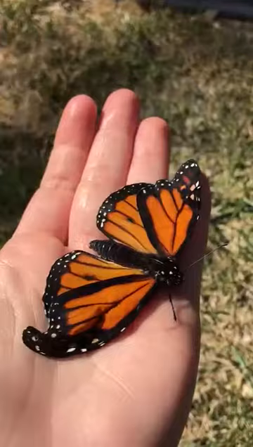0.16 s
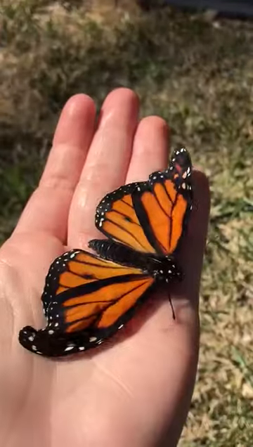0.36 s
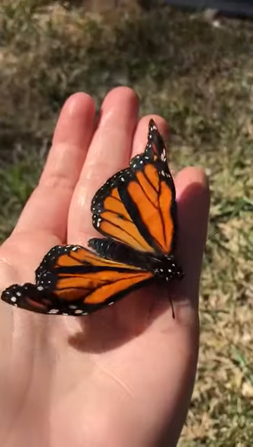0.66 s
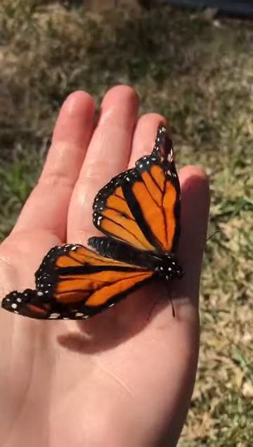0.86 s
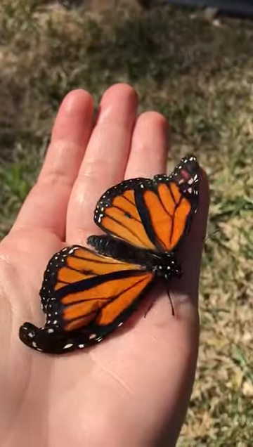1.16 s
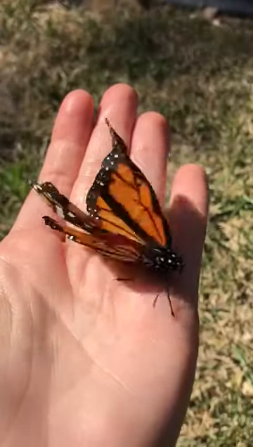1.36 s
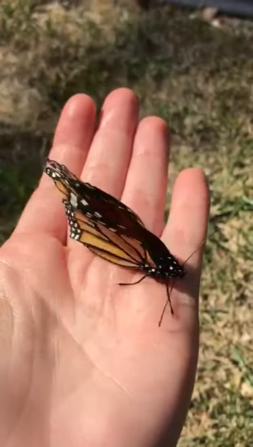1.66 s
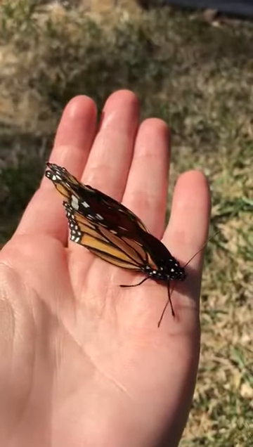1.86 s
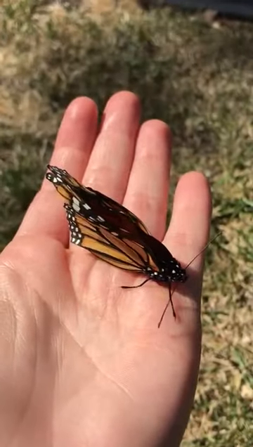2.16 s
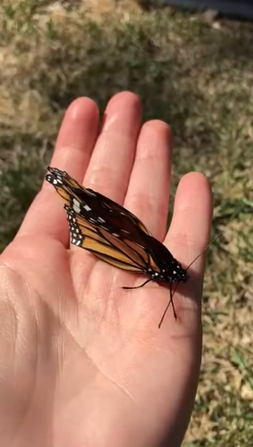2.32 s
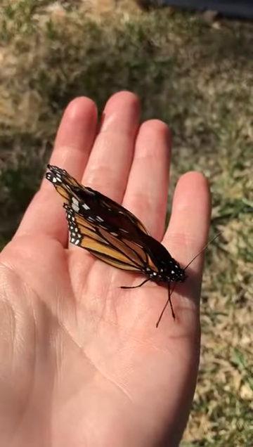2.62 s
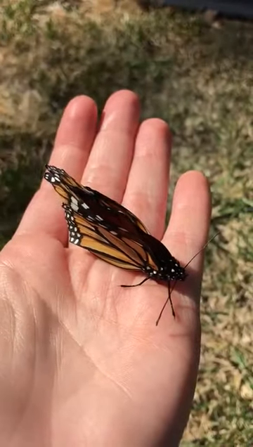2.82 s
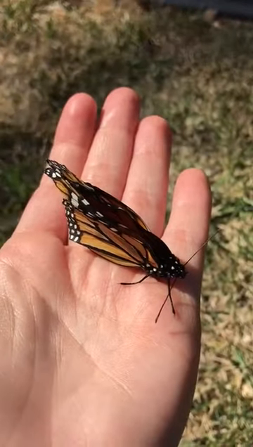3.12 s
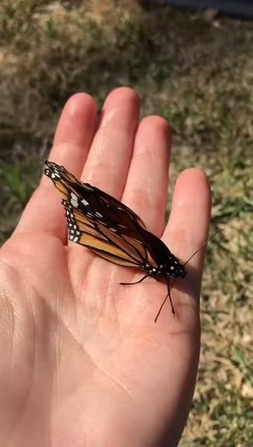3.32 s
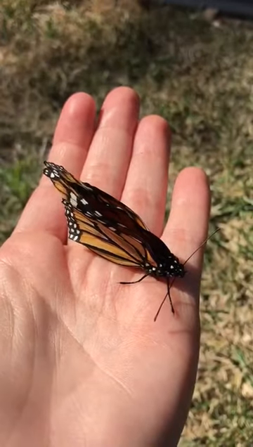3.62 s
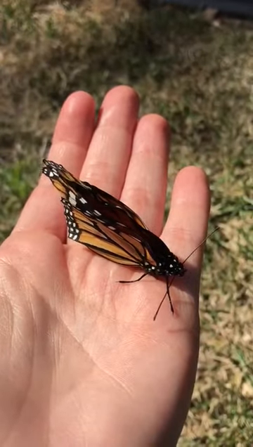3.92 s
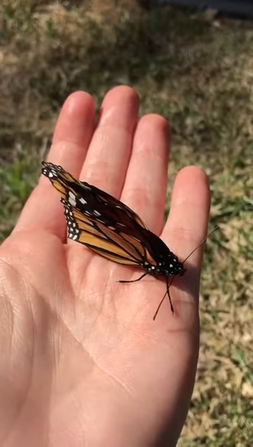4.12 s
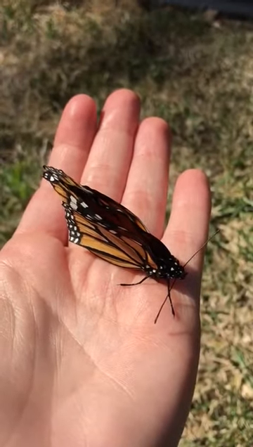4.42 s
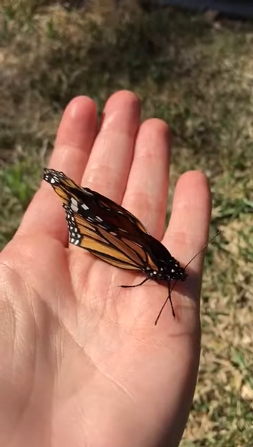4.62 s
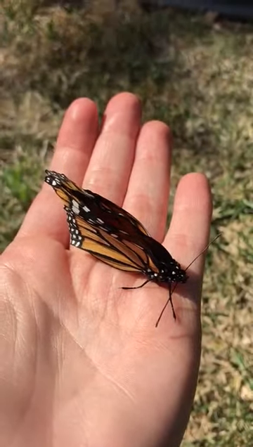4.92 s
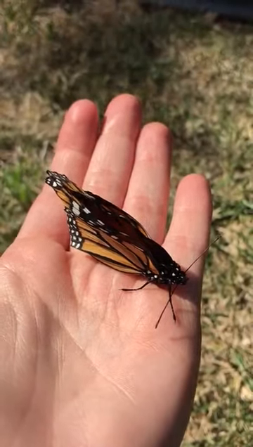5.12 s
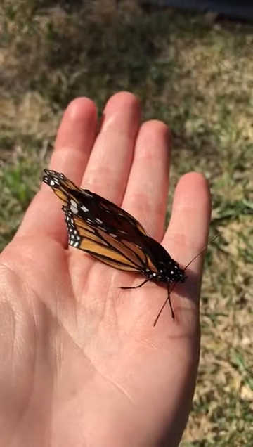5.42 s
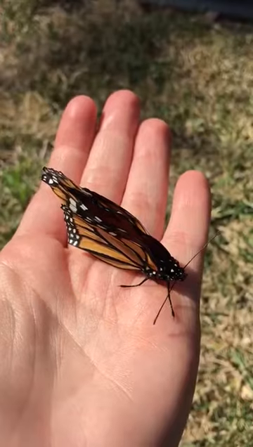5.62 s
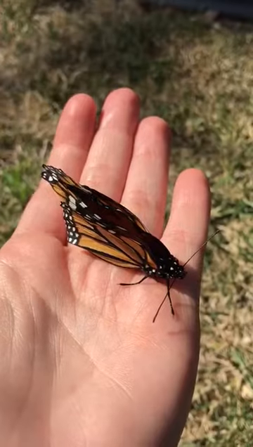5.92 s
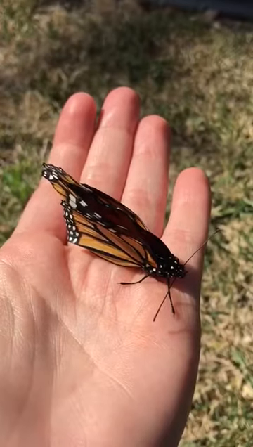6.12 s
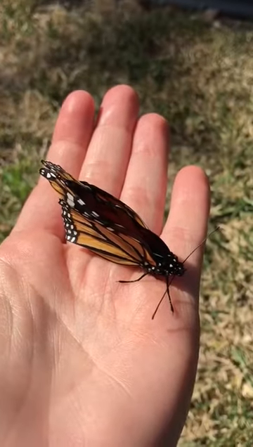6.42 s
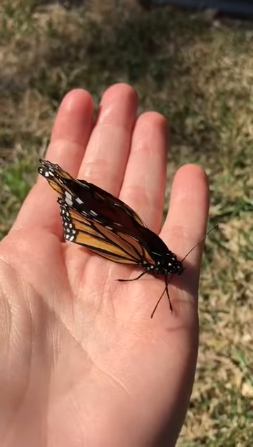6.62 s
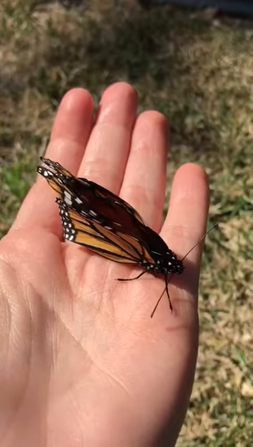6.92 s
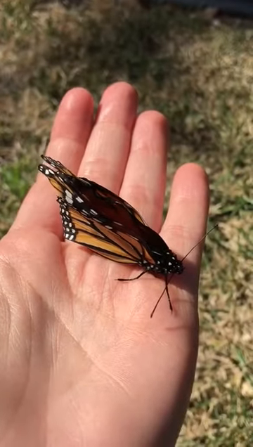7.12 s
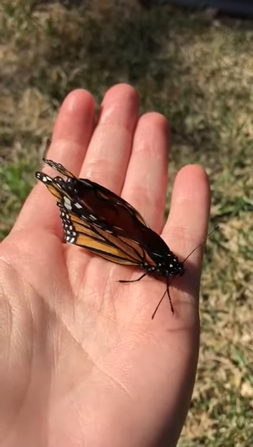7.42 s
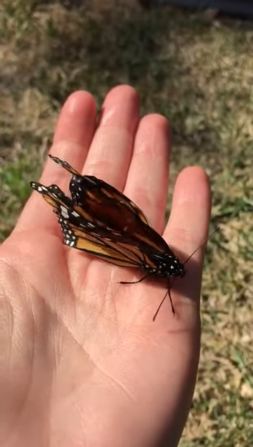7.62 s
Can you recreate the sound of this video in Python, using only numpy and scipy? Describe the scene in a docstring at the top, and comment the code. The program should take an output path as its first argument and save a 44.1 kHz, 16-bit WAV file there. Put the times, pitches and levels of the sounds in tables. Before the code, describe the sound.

A distant engine hums steadily over low rumble and traffic, while small birds chirp faintly and far-off dogs seem to bark.

```python
"""A quiet lawn. From the start a far-off three-cylinder engine hums over rumble and traffic, and a deep
drone beats against it. Small birds chirp and whistle in the trees, on and off to the end. Early on, a
low boom swells and two brief rustles pass. Near two seconds far-away calls begin, like barking dogs
smeared by echoes, and the engine swells. After three seconds it eases and the traffic recedes."""
import sys
import numpy as np
from scipy import signal
from scipy.fft import rfft, irfft
from scipy.io import wavfile

SR = 44100
rng = np.random.default_rng(int(sys.argv[2]) if len(sys.argv) > 2 else 0)


def wrap_up_sound(samples):
    """Save the sound to the file named by the first command line argument, as 16-bit audio."""
    columns = np.atleast_2d(samples).T
    # keep every value between -1 and 1, then stretch to whole-number steps
    tamed = np.clip(columns, -1, 1)
    steps = np.round(tamed * 32767).astype(np.int16)
    wavfile.write(sys.argv[1], SR, steps)


N = 342216
TIME = np.arange(N) / SR

# The engine's lowest tone and the drone beside it: time_s, firing_tone_db, drone_db
DEEP_LEVELS = [(0, -54, -55), (0.3, -45.5, -44), (0.9, -46, -44.5), (2.3, -53, -55), (3.05, -47.5, -60),
               (4.35, -56.5, -61), (4.8, -52, -63), (5.8, -55.5, -64), (6.5, -59, -62), (7.76, -60, -67)]


def from_db(db):
    """Turn decibels into a number to multiply by."""
    return 10 ** (np.asarray(db) / 20)


def unit_power(x):
    """Scale a signal so that its average power is 1."""
    return x / np.sqrt(np.mean(x ** 2) + 1e-20)


def in_time(rows):
    """Join a table's timed points with straight lines, giving one curve for each value column."""
    times, *columns = np.transpose(rows)
    return [np.interp(TIME, times, column) for column in columns]


def drift(rate_hz):
    """A smooth random wander of about 1 either way; a higher rate wanders faster."""
    step = 40  # samples between random points
    pole = np.exp(-2 * np.pi * step * rate_hz / SR)
    noise = rng.standard_normal(N // step + 2002)
    slow = signal.lfilter([1], [1, -2 * pole, pole * pole], noise)[2000:]  # skip the filter's warm-up
    return np.interp(np.arange(N) / step, np.arange(len(slow)), unit_power(slow))


def wash(spectrum):
    """Smooth noise of power 1, shaped by rows of frequency_hz, relative_db."""
    hz, db = np.transpose(spectrum)
    bins_hz = np.maximum(np.fft.rfftfreq(N, 1 / SR), 1)
    roll_off = np.minimum(bins_hz / hz[0], 1) ** 2 * np.minimum(hz[-1] / bins_hz, 1) ** 2
    gain = from_db(np.interp(np.log(bins_hz), np.log(hz), db)) * roll_off
    return unit_power(irfft(rfft(rng.standard_normal(N)) * gain, N))


def resonance(hz, width_hz):
    """Noise of power 1 that rings around one pitch."""
    edges_hz = hz * np.exp(np.array([-0.5, 0.5]) * width_hz / hz)
    band = signal.butter(2, edges_hz, "band", fs=SR, output="sos")
    return unit_power(signal.sosfilt(band, rng.standard_normal(N)))


def swell(start_s, length_s):
    """One short sound's sample positions, its progress from 0 to 1 and its rounded rise and fall."""
    at = np.arange(max(int(start_s * SR), 0), min(int((start_s + length_s) * SR), N))
    progress = np.linspace(0, 1, int(length_s * SR) + 2)[:len(at)]
    return at, progress, np.sqrt(np.abs(np.sin(np.pi * progress)))


def outdoors(sound, decay_s, echo_db):
    """Trees and walls scatter a short tail of echoes, which falls at 60 dB per decay_s."""
    t = TIME[:SR // 2]
    echoes = rng.standard_normal(len(t)) * (rng.random(len(t)) < 0.02)
    echoes *= from_db(-60 * t / decay_s)
    tail = signal.fftconvolve(sound, echoes / np.sqrt(np.sum(echoes ** 2)))[:N]
    return (sound + from_db(echo_db) * tail) / np.sqrt(1 + from_db(2 * echo_db))


def rumble(start_db=-46.5, fade_db_per_s=2.5, steady_db=-55):
    """A low rumble that dies down toward a steady level."""
    # The rumble's tone colour: frequency_hz, relative_db
    spectrum = [(20, -19), (30, -15.5), (44, -3), (60, -1.5), (90, -1), (130, -4.5), (200, -6.5),
                (280, -14)]
    fading = from_db(start_db - fade_db_per_s * TIME)
    return np.hypot(fading, from_db(steady_db)) * wash(spectrum)


def boom():
    """A narrow, unsteady band of low noise that swells early and sinks into the rumble."""
    # The boom's rise and fall: time_s, level_db
    levels = [(0, -53), (0.5, -41), (1.1, -51), (3.2, -54), (4.0, -68)]
    return from_db(in_time(levels)[0]) * resonance(hz=90, width_hz=12)


def town(level_db=-61.7, waver_db=0.5):
    """The nearly steady noise of the far-off town."""
    # The town's tone colour: frequency_hz, relative_db
    spectrum = [(300, -13), (480, -6), (600, 1.5), (800, 0), (970, 1), (1300, -8)]
    return from_db(level_db + waver_db * drift(3.0)) * wash(spectrum)


def receding_db():
    """The change in the traffic's level: it holds, then falls as the traffic moves away."""
    # The traffic's fall: time_s, change_db
    fall = [(0, 0.5), (2.9, 0), (3.6, -3), (4.1, -4), (4.35, -2), (5.0, -4.5), (5.4, -5.5), (7.0, -8),
            (7.76, -8)]
    return in_time(fall)[0]


def traffic(level_db=-52.5, waver_db=0.57):
    """Broad road noise that wavers a little as it recedes."""
    # The road's tone colour: frequency_hz, relative_db
    spectrum = [(200, 6.5), (400, -6), (490, -1), (600, 3), (780, 0.5), (1000, 1.5), (1300, -2), (2000, -9),
                (2600, -12.5), (3000, -17.5), (4100, -19.5), (5200, -30)]
    return from_db(level_db + receding_db() + waver_db * drift(2.5)) * wash(spectrum)


def traffic_hiss(level_db=-72, fall_share=0.34, waver_db=0.55):
    """A fine hiss that follows part of the traffic's fall."""
    # The hiss's tone colour: frequency_hz, relative_db
    spectrum = [(2000, -3), (4000, 5.5), (5000, 3.5), (6200, 3), (7600, -2.5), (8700, -1), (10300, -6),
                (11500, -8)]
    return from_db(level_db + fall_share * receding_db() + waver_db * drift(10.0)) * wash(spectrum)


def traffic_whistle(pitch_hz=3115, level_db=-82, fall_share=0.55, waver_db=2.2):
    """A faint, nearly steady high tone that recedes with the traffic."""
    loudness = from_db(level_db + fall_share * receding_db() + waver_db * drift(2.7))
    return loudness * np.sin(2 * np.pi * pitch_hz * TIME + 0.72 * drift(17))


def rustles(grain_db=3.5):
    """Brief grainy brushes of noise, an octave wide."""
    # One rustle a row: start_s, length_s, centre_hz, level_db
    brushes = [(0.657, 0.23, 1700, -66), (1.32, .06, 10000, -76)]
    out, grain = np.zeros(N), from_db(grain_db * drift(90))
    for start_s, length_s, centre_hz, level_db in brushes:
        at, _, envelope = swell(start_s, length_s)
        noise = wash([(centre_hz / np.sqrt(2), 0), (centre_hz * np.sqrt(2), 0)])
        out[at] += from_db(level_db) * envelope * unit_power(noise * grain)[at]
    return out


def birds(rasp_hz=220, fade_db=5.0, flicker_db=4.0):
    """Each note is one sliding, fading tone; rasp shakes its pitch and level, and trees smear it."""
    # One bird note a row: start_s, length_s, start_hz, end_hz, bend, level_db, rasp (0 to 1)
    # With a bend above 0 the slide settles; below 0 it speeds up.
    notes = [(0.31, 0.1, 4460, 4380, -1, -62, 0.35), (0.46, .135, 3700, 4030, 0.5, -63, 0.18),
             (1.945, .08, 4210, 4180, 1, -64, .35), (2.13, 0.085, 4400, 3750, 1, -64, 0.55),
             (2.81, 0.28, 4330, 4700, -1, -72.5, .65), (3.12, 0.21, 4700, 4570, -1, -72, .45),
             (3.228, .045, 4230, 4290, 1, -67.5, .25), (3.315, .09, 6020, 5870, 1, -71, .6),
             (3.335, 0.085, 4620, 4220, -1, -66, .5), (3.43, .2, 4150, 4060, 2, -73.5, .25),
             (3.51, 0.37, 3120, 3110, 3, -73, 0.018), (4.16, .16, 3780, 3860, 1, -74, .15),
             (4.745, .2, 3370, 3335, 1.5, -68.5, 0.08), (5.795, 0.1, 4180, 4700, -1.5, -69, 0.35),
             (5.785, 0.1, 2750, 2765, 1, -71, 0.03), (5.925, 0.11, 2755, 2775, 1, -71, 0.03),
             (6.05, 0.29, 6120, 4640, 3.5, -71.5, 0.18), (7.015, .06, 4300, 4450, -1, -68.5, 0.8),
             (7.215, .04, 4320, 4700, 2, -76, 0.8), (7.505, 0.14, 4330, 4200, 2, -69, 0.5),
             (7.6, 0.19, 3540, 3740, 1, -73, 0.25)]
    out, shake, flicker = np.zeros(N), drift(150), flicker_db * drift(25)
    for start_s, length_s, start_hz, end_hz, bend, level_db, rasp in notes:
        at, progress, envelope = swell(start_s, length_s)
        slide = np.expm1(-bend * progress) / np.expm1(-bend)
        pitch_hz = start_hz + (end_hz - start_hz) * slide + rasp * rasp_hz * shake[at]
        loudness = from_db(level_db + fade_db * (0.5 - progress) + rasp * flicker[at])
        out[at] += loudness * envelope * np.sin(2 * np.pi * np.cumsum(pitch_hz) / SR)
    return outdoors(out, decay_s=0.75, echo_db=-3.0)


def barks(voice_db=-4.0, broad_db=-5.0, broad_width_hz=330, waver_share=0.45):
    """Only one throat resonance, its wavering tone and its octave carry this far; echoes blur them."""
    # One hoarse call a row: start_s, length_s, pitch_hz, spread_hz, level_db, octave_db
    # The octave, voice and broad levels are relative to the call's narrow band of noise.
    calls = [(1.742, .14, 579, 35, -49.5, -24), (1.92, 0.13, 588, 50, -54, -24),
             (2.37, .16, 1020, 130, -52, -20), (2.48, .13, 1005, 110, -48, -6.5),
             (2.71, .16, 990, 100, -58.5, -1), (2.73, .42, 585, 150, -47.5, -18),
             (2.94, .18, 985, 130, -50.5, -15), (3.06, .38, 465, 120, -52, -20),
             (3.1, .2, 572, 60, -43.5, -25), (3.27, .29, 600, 130, -48, -26),
             (3.35, .16, 950, 150, -55, -17), (3.95, .3, 610, 220, -57, -24),
             (4.19, .32, 1020, 220, -55.5, -15), (4.56, .19, 545, 60, -55.5, -22),
             (5.58, .24, 602, 110, -56, -24), (6.47, .11, 905, 80, -50.5, -26),
             (6.57, 0.25, 575, 45, -54.5, -26), (6.759, .1, 875, 80, -56, -26),
             (6.81, 0.2, 663, 60, -59, -22), (7.338, .2, 954, 130, -59.5, -20),
             (7.533, .1, 610, 130, -52.5, -22)]
    out, waver = np.zeros(N), waver_share * drift(70)
    for start_s, length_s, pitch_hz, spread_hz, level_db, octave_db in calls:
        at, progress, _ = swell(start_s, length_s)
        phase = 2 * np.pi * np.cumsum(pitch_hz + spread_hz * waver[at]) / SR
        throat = resonance(pitch_hz, spread_hz)
        throat += from_db(broad_db) * resonance(pitch_hz, broad_width_hz)
        tone = from_db(voice_db) * np.sin(phase) + from_db(octave_db) * np.sin(2 * phase)
        call = unit_power(throat[at] + np.sqrt(2) * tone)
        out[at] += from_db(level_db) * np.sin(np.pi * progress) * call
    return outdoors(out, decay_s=0.8, echo_db=-5.0)


def engine_cycle():
    """The engine's cycle as an angle: three cylinders fire per cycle, and the speed sags in steps."""
    # The main hum, at twice the firing rate: time_s, pitch_hz
    pitches = [(0, 110.2), (0.8, 109.5), (2.1, 109.6), (2.6, 109.4), (3.2, 109.7), (3.9, 109.2),
               (4.15, 108.35), (5.3, 108.4), (5.6, 107.8), (6.3, 108.4), (7.2, 107.3), (7.76, 107.7)]
    cycle_hz = in_time(pitches)[0] / 6
    return 2 * np.pi * np.cumsum(cycle_hz) / SR


def drone(throb_s=0.64, first_dip_s=0.56):
    """A deep tone just above the firing rate: it beats against the engine as it dies away."""
    _, level_db = in_time(DEEP_LEVELS)
    firing = 3 * engine_cycle()
    beat = 2 * np.pi * (TIME - first_dip_s) / throb_s
    return -np.sqrt(2) * from_db(level_db) * np.sin(firing + beat)


def engine_roar(gain_db=-4.0, chug_depth=0.1):
    """The engine's rushing noise, which pulses each time a cylinder fires."""
    # The roar's rise and fall, before gain_db is added: time_s, level_db
    levels = [(0, -53), (1.6, -59.5), (2.2, -53.5), (2.62, -46.5), (2.85, -46.5), (3.35, -47.5), (3.7, -51),
              (4.15, -58.5), (4.6, -51.5), (5.1, -66), (5.6, -58), (6.5, -62.5), (7.76, -60)]
    # The roar's tone colour: frequency_hz, relative_db
    spectrum = [(170, -5), (250, -2.5), (290, -1.5), (345, 7), (400, 0.5), (440, -3.5), (490, -11.5),
                (590, -7), (760, -18), (1200, -22)]
    chug = 1 + chug_depth * np.cos(3 * engine_cycle())
    return from_db(in_time(levels)[0] + gain_db) * chug * wash(spectrum)


def engine_hum(second_lift_db=0.34, third_lift_db=0.1, flutter=0.04, fading=0.55):
    """The exhaust hums at 1 to 4 times the firing rate; unequal cylinders add weak extra tones."""
    # The two strong tones, before their lifts are added: time_s, second_db, third_db
    strong_levels = [(0.0, -48, -47), (0.08, -42.5, -44), (0.86, -43, -43), (1.71, -34, -39),
                     (1.88, -32, -34.5), (2.55, -37, -33.5), (2.96, -32.5, -34), (3.67, -35, -42),
                     (4.62, -41, -41), (5.03, -44, -49.5), (5.3, -39, -43.5), (5.71, -41.5, -50.5),
                     (5.97, -40, -47), (6.11, -40, -58), (6.4, -43, -48.5), (7.39, -38.5, -49),
                     (7.63, -40.5, -55), (7.76, -42, -56.5)]
    # The fourth tone: time_s, level_db
    fourth_levels = [(0.35, -66), (.66, -50), (1.08, -59), (1.33, -53), (1.6, -64), (1.98, -50), (2.5, -49),
                     (3.02, -51.5), (3.22, -61), (3.62, -67), (3.9, -52.5), (4.25, -64), (4.55, -54.5),
                     (5.75, -68), (6.05, -57), (6.55, -53.5), (6.98, -69), (7.35, -52), (7.76, -52)]
    # Faint exhaust tones: multiple (of the cycle rate), relative_db (added to third_db)
    weak_tones = [(4, -29), (5, -25), (7, -28), (10, -32), (11, -28), (16, -31), (19, -30), (21, -32),
                  (24, -29.5)]
    first_db, _ = in_time(DEEP_LEVELS)
    second_db, third_db = in_time(strong_levels)
    fourth_db = in_time(fourth_levels)[0]
    levels = [first_db, second_db + second_lift_db, third_db + third_lift_db, fourth_db]
    out, cycle = np.zeros(N), engine_cycle()
    for harmonic, level_db in enumerate(levels, 1):
        out += from_db(level_db) * (1 + flutter * drift(3.4)) * np.sin(3 * harmonic * cycle)
    for multiple, relative_db in weak_tones:
        # Moving air makes the weak tones fade and wander.
        wander = rng.uniform(0, 2 * np.pi) + fading * drift(2.2)
        loudness = from_db(third_db + relative_db) * (1 + fading * drift(1.5))
        out += loudness * np.sin(multiple * cycle + wander)
    return np.sqrt(2) * out


def scene():
    """Everything as heard from the lawn, in one channel."""
    low_sounds = engine_hum() + drone() + boom() + rumble() + engine_roar()
    far_noise = traffic() + town() + traffic_hiss()
    return (low_sounds + far_noise + birds() + traffic_whistle() + barks() + rustles())[None]


def record(dry):
    """Cut the highest treble steeply."""
    cutoff_hz = 11900
    return signal.sosfilt(signal.ellip(12, 0.1, 80, cutoff_hz, fs=SR, output="sos"), dry)


dry = scene()
out = record(dry)
wrap_up_sound(out)
```